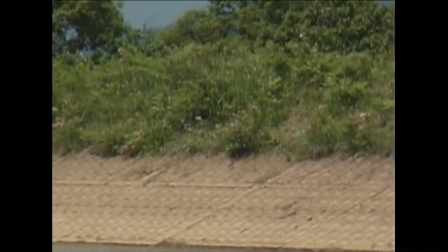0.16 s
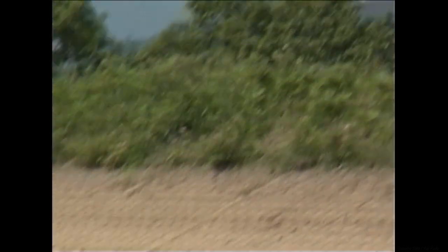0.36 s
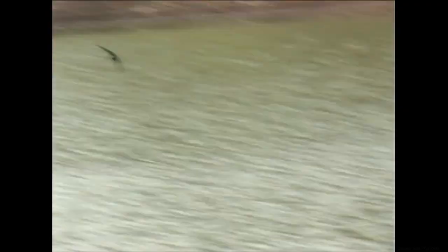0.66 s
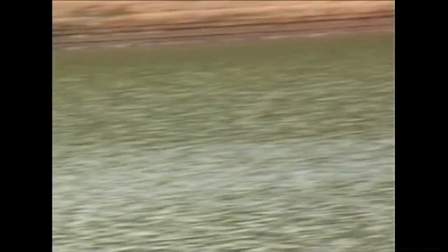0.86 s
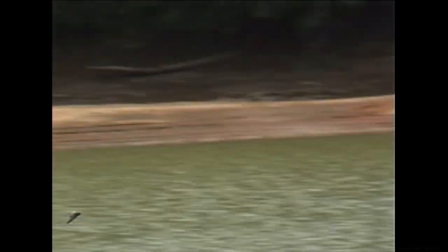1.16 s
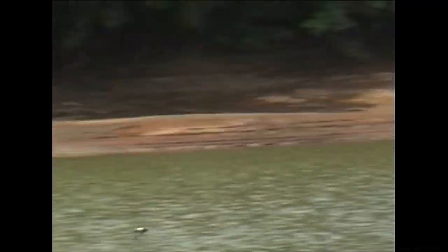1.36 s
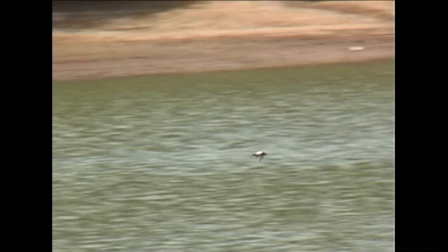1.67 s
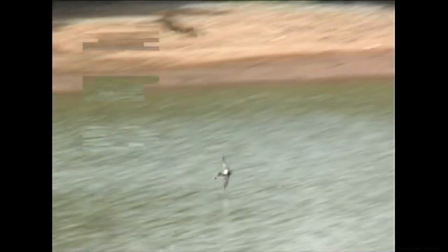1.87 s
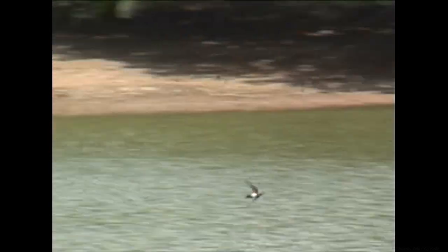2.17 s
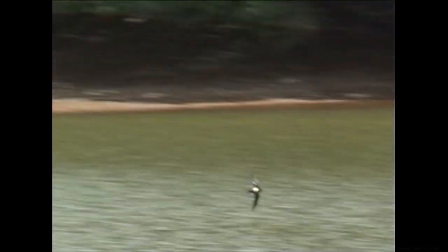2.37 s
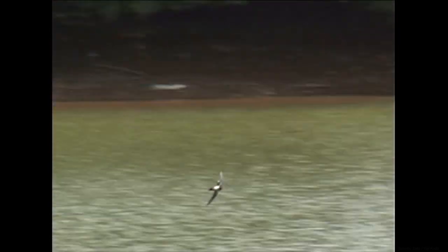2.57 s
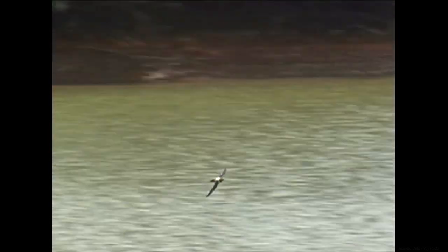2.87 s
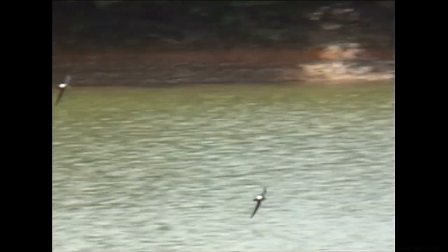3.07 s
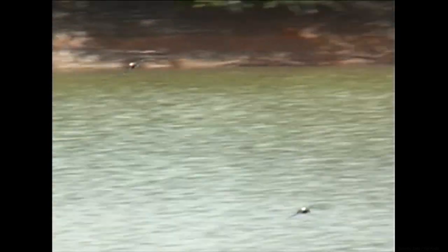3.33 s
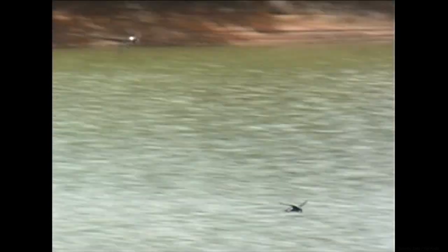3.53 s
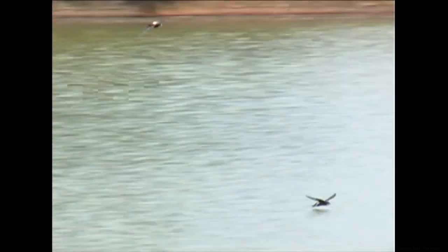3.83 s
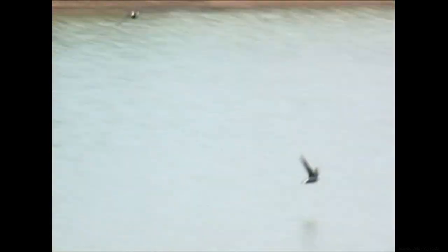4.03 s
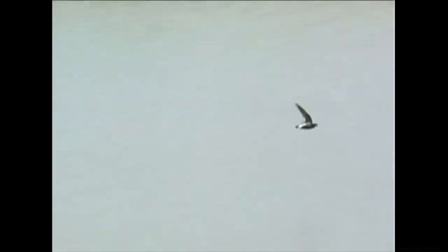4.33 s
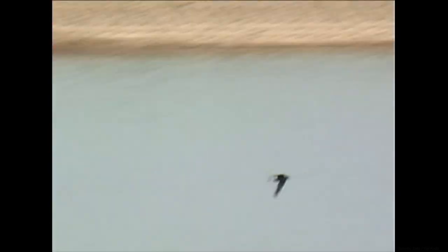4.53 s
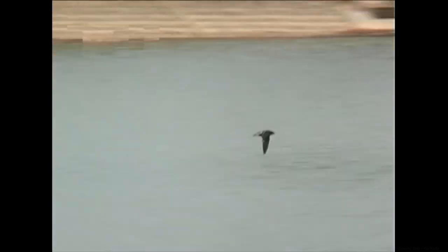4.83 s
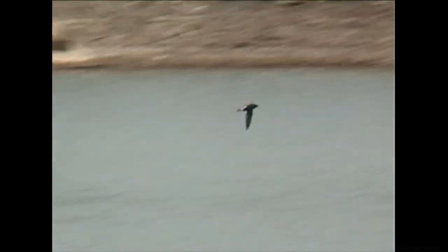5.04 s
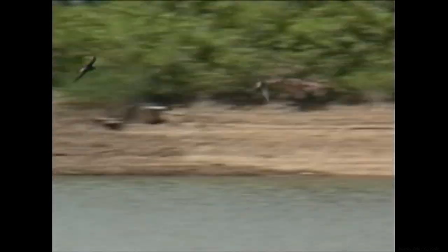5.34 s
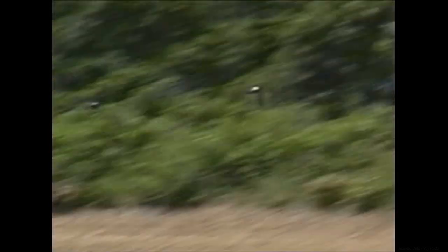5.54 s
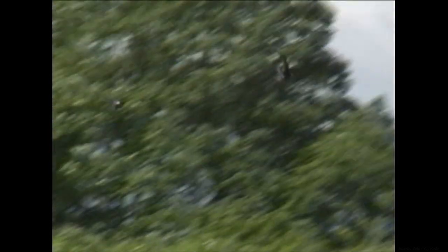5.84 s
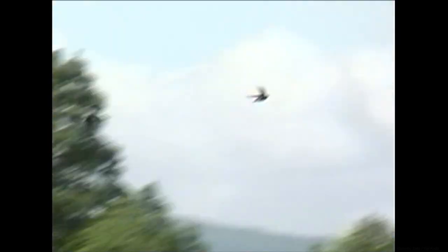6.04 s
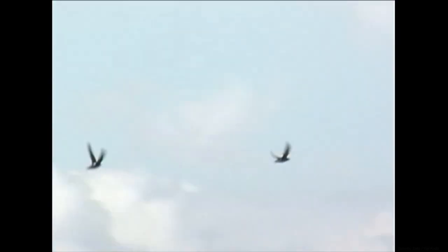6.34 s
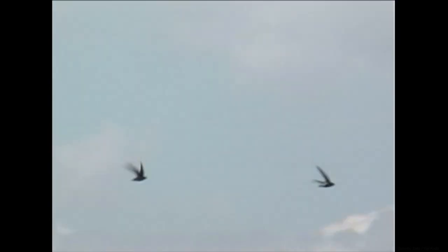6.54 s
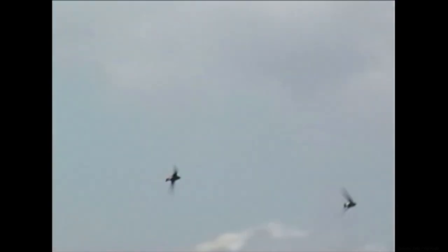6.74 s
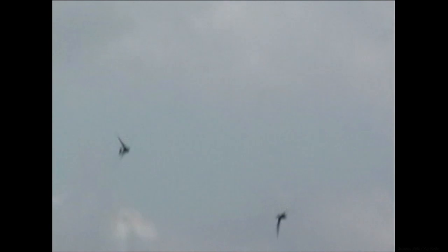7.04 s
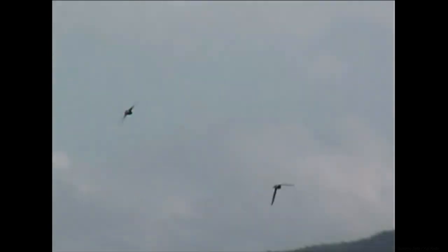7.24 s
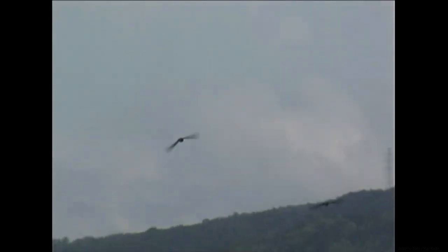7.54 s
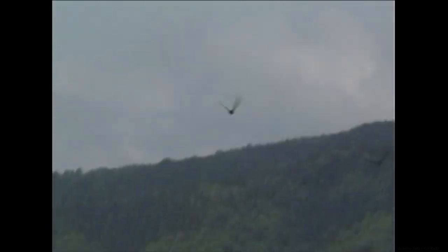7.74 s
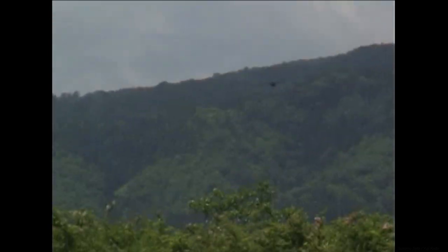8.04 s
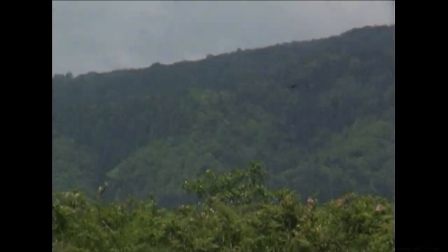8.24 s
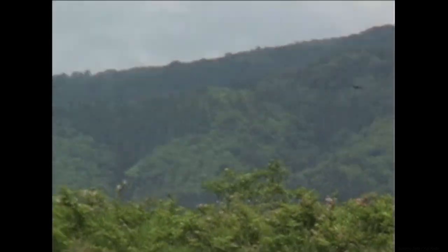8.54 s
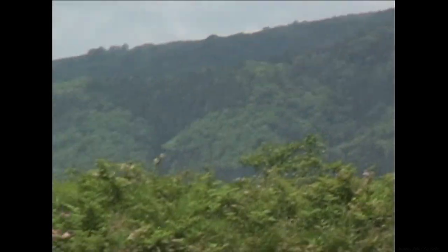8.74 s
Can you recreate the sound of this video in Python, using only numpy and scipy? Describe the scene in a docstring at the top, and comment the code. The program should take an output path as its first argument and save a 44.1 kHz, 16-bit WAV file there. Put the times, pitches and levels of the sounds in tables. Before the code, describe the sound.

Outdoors by a reservoir, a steady hiss of distant leaves and water. A few faint bird chirps, a split-second dropout, then swifts twitter in quick, thin, high bursts. The calls thicken and peak past the middle, with one small sharp snap, then thin out to scattered chirps. Insects buzz faintly. Stereo camera microphone with a slight mechanical whine.

```python
"""An open reservoir: swifts twitter in flight, near and far, and something snaps sharply once.
Calls are gliding sine tones scattered into a short haze; the snap is noise bursts through resonances.
Insects buzz on the bank as narrow noise beaten in level, and a tape drum whines as wavering sine lines.
Shaped stereo noise gives far leaves and water, a treble hiss that rises and sinks partly with them,
and a faint, unsteady bass rumble. The sound drops out once for a moment, under a sharp upper band limit."""
import sys
import numpy as np
from scipy import signal
from scipy.fft import rfft, irfft, next_fast_len
from scipy.io import wavfile
from scipy.ndimage import uniform_filter1d, map_coordinates

SR = 44100
rng = np.random.default_rng(int(sys.argv[2]) if len(sys.argv) > 2 else 0)


def bounce(signal):
    """Save signal as a 16-bit WAV file at the path given by the first command-line argument."""
    frames = np.transpose(np.atleast_2d(signal))
    limited = np.clip(frames, -1, 1)
    pcm = np.round(limited * 32767).astype(np.int16)
    wavfile.write(sys.argv[1], SR, pcm)


N = 392490  # length [samples]

# Near swift calls, with points at 0, 30, 70 and 100 % of the nominal length:
# (time [s], nominal length [ms], start [Hz], early [Hz], late [Hz], end [Hz],
#  early level [dB], late level [dB], left over right [dB])
NEAR_CALLS = [(0.29, 13, 3660, 3590, 3590, 3210, -37, -45, 2),
              (0.414, 13, 3170, 3160, 3200, 2880, -38, -43, 8),
              (1.334, 12, 4260, 4580, 4830, 4610, -43, -41, -11),
              (1.376, 14, 3930, 4310, 4660, 4620, -39, -40, -20),
              (1.39, 14, 6690, 6560, 6390, 6510, -40, -53, 2),
              (1.41, 13, 3620, 3720, 3840, 3870, -46, -39, -5),
              (1.422, 19, 3850, 3910, 3710, 3650, -44, -44, -13),
              (1.431, 14, 6380, 6670, 6590, 6280, -37, -39, 0),
              (1.514, 17, 5000, 4760, 3810, 3790, -44, -43, -14),
              (1.546, 23, 4580, 4620, 4560, 4400, -38, -42, -14),
              (1.679, 9, 5350, 5280, 5630, 6180, -32, -30, 2),
              (1.687, 12, 6520, 6590, 6610, 6180, -19, -25, 5),
              (1.698, 8, 5400, 5360, 4860, 3890, -28, -45, 4),
              (1.846, 14, 6850, 7030, 7000, 6820, -26, -27, 7),
              (1.858, 12, 5510, 5250, 5360, 6010, -40, -50, 8),
              (1.885, 22, 6920, 6900, 6680, 6860, -41, -47, 5),
              (2.0, 14, 5190, 5760, 6210, 6280, -33, -33, 4),
              (2.013, 15, 6190, 6020, 5940, 5840, -31, -42, 3),
              (2.024, 14, 6890, 6940, 6810, 6900, -33, -32, 7),
              (2.138, 20, 6940, 6880, 6870, 6800, -44, -46, 12),
              (2.182, 16, 7110, 7490, 7320, 6500, -27, -37, -3),
              (2.22, 22, 6580, 7600, 7860, 6440, -31, -29, -2),
              (2.25, 16, 5020, 5070, 5110, 4510, -41, -44, -2),
              (2.267, 7, 7060, 6970, 7050, 7160, -32, -35, 6),
              (2.276, 19, 8760, 8540, 6940, 6840, -40, -31, 2),
              (2.386, 20, 6520, 6610, 6970, 7000, -41, -46, 4),
              (2.405, 12, 6900, 6890, 6480, 6110, -38, -50, 10),
              (2.417, 18, 5110, 5550, 5780, 5350, -36, -32, 4),
              (2.434, 8, 5450, 5280, 5080, 5070, -30, -44, 4),
              (2.501, 19, 4530, 4920, 5050, 4840, -32, -37, -1),
              (2.519, 14, 4850, 4800, 4490, 4220, -30, -40, 0),
              (2.598, 21, 4990, 5230, 5130, 4840, -19, -21, 3),
              (2.624, 15, 4710, 4850, 4880, 4850, -41, -32, 2),
              (2.638, 15, 4850, 4730, 4430, 4380, -36, -32, 3),
              (3.055, 16, 4520, 4430, 4400, 4320, -45, -46, -13),
              (3.217, 20, 4380, 5490, 5850, 5770, -36, -44, -15),
              (3.255, 7, 4810, 4610, 4930, 5150, -43, -37, -15),
              (3.259, 23, 5830, 6020, 5900, 4460, -34, -40, -19),
              (3.99, 22, 4750, 5350, 5040, 4280, -33, -40, 5),
              (4.087, 13, 4910, 5120, 5400, 5280, -41, -44, 0),
              (4.095, 8, 6110, 6250, 6310, 6420, -42, -37, 2),
              (4.102, 22, 6380, 6630, 6510, 6470, -39, -40, 2),
              (4.126, 17, 3770, 3710, 3560, 3370, -41, -42, 1),
              (4.198, 18, 5360, 5030, 4650, 5020, -41, -47, 1),
              (4.199, 21, 6480, 6350, 6110, 5670, -41, -45, 1),
              (4.236, 17, 6360, 6500, 6430, 6310, -32, -35, 1),
              (4.262, 16, 4420, 4350, 4080, 3990, -42, -46, -9),
              (4.308, 19, 6670, 6800, 6100, 5630, -49, -45, 5),
              (4.363, 16, 6360, 6870, 7080, 7010, -49, -40, 2),
              (4.376, 12, 4380, 4590, 4660, 4680, -42, -42, -7),
              (4.413, 16, 6270, 7260, 7750, 7470, -38, -42, -1),
              (4.46, 15, 6260, 6630, 6650, 6600, -38, -42, 0),
              (4.506, 21, 6920, 7730, 6830, 6080, -38, -49, 0),
              (4.537, 11, 5140, 5070, 4940, 4920, -39, -46, 1),
              (4.542, 13, 6450, 6680, 6920, 6920, -39, -50, 0),
              (4.554, 18, 7600, 7510, 7560, 7620, -40, -52, -1),
              (4.585, 23, 6300, 6590, 6690, 6040, -43, -43, -1),
              (4.678, 17, 6330, 6280, 6190, 6060, -46, -43, 5),
              (4.703, 27, 4370, 4550, 4350, 3660, -43, -43, -1),
              (4.795, 17, 4890, 4870, 4920, 4480, -40, -48, -5),
              (4.795, 30, 6910, 6760, 6460, 6780, -33, -40, -3),
              (4.835, 19, 4970, 4960, 4910, 4510, -37, -38, -1),
              (4.874, 10, 5910, 6110, 6170, 6230, -38, -34, 11),
              (4.883, 30, 6290, 6570, 6520, 5920, -32, -30, -2),
              (4.912, 22, 5890, 5970, 6090, 6080, -28, -40, 8),
              (4.933, 14, 6020, 6030, 5720, 5770, -34, -43, 10),
              (5.021, 17, 4020, 4370, 4450, 4570, -45, -35, 5),
              (5.037, 9, 4490, 4680, 4890, 4980, -40, -38, 7),
              (5.04, 16, 6730, 6780, 6710, 6260, -23, -24, 2),
              (5.075, 24, 6350, 6480, 6650, 6020, -30, -31, -1),
              (5.091, 14, 4810, 4910, 4700, 4600, -45, -38, -1),
              (5.192, 24, 5390, 6070, 5990, 5980, -36, -41, -5),
              (5.24, 15, 6270, 6470, 6530, 6230, -16, -18, 3),
              (5.251, 14, 4140, 4390, 4400, 3550, -47, -38, 3),
              (5.261, 19, 6860, 7160, 7050, 6880, -23, -29, 6),
              (5.276, 7, 5410, 5450, 5330, 5100, -36, -45, 4),
              (5.28, 21, 6140, 6490, 6220, 5490, -20, -28, 1),
              (5.296, 10, 4290, 4690, 4390, 4290, -35, -39, 4),
              (5.299, 19, 6410, 6790, 6510, 6060, -24, -31, 0),
              (5.349, 21, 4030, 4550, 4660, 4960, -34, -30, 0),
              (5.366, 22, 5760, 6010, 6020, 5620, -27, -27, -2),
              (5.394, 7, 4650, 4730, 4890, 5090, -29, -31, -1),
              (5.399, 15, 5940, 6070, 5840, 5930, -24, -35, -1),
              (5.428, 15, 6300, 6600, 6510, 6160, -14, -20, 1),
              (5.444, 9, 4860, 4720, 4820, 4910, -27, -37, -1),
              (5.451, 17, 6250, 6580, 6660, 6280, -19, -19, 2),
              (5.478, 16, 5060, 4990, 5410, 5210, -38, -47, 0),
              (5.483, 24, 6230, 6310, 6160, 6540, -34, -40, -4),
              (5.506, 11, 4570, 4750, 4860, 4880, -36, -29, -2),
              (5.51, 28, 6090, 5960, 6410, 6640, -39, -45, -1),
              (5.543, 12, 5930, 6190, 6100, 5620, -37, -40, -5),
              (5.568, 13, 4990, 5040, 5260, 6090, -37, -41, 1),
              (5.58, 19, 6720, 6840, 6760, 6200, -22, -25, 0),
              (5.598, 6, 5020, 4900, 4810, 4920, -39, -38, -1),
              (5.603, 10, 5990, 6280, 6220, 6580, -32, -41, 0),
              (5.617, 15, 6480, 5830, 6670, 6530, -43, -36, -1),
              (5.631, 13, 6190, 6240, 6190, 6210, -29, -37, -3),
              (5.662, 15, 6110, 6320, 6250, 5860, -28, -31, 3),
              (5.665, 18, 4720, 4610, 4570, 4440, -40, -43, 1),
              (5.693, 20, 6030, 6380, 6210, 6330, -29, -36, 5),
              (5.723, 12, 4890, 5010, 5100, 5000, -32, -46, 0),
              (5.726, 16, 6270, 6280, 6410, 5690, -39, -38, 4),
              (5.76, 11, 4900, 4920, 4750, 4850, -39, -45, 3),
              (5.765, 18, 6540, 6510, 6540, 6570, -30, -37, 3),
              (5.786, 19, 4580, 4530, 5230, 5390, -41, -44, 3),
              (5.798, 16, 6530, 6430, 6460, 6510, -31, -40, 2),
              (5.902, 21, 5210, 5820, 6510, 5760, -33, -33, 15),
              (5.964, 16, 4710, 5030, 4710, 4310, -45, -44, 17),
              (6.114, 15, 6400, 6350, 6180, 5690, -42, -48, 7),
              (6.226, 16, 5660, 6220, 5950, 5970, -36, -41, 6),
              (6.281, 11, 5450, 5500, 5160, 5390, -40, -49, 8),
              (6.326, 15, 6470, 6650, 6450, 6700, -40, -43, -4),
              (6.371, 13, 6400, 6460, 6490, 6280, -45, -42, -5),
              (6.413, 8, 6540, 6660, 6700, 6680, -43, -42, -2),
              (6.422, 12, 6690, 6750, 6790, 7510, -41, -51, -5),
              (6.455, 20, 6510, 6690, 6690, 6520, -37, -40, -2),
              (6.599, 23, 6380, 6600, 6400, 6490, -47, -47, -2),
              (6.753, 19, 5440, 5510, 5480, 5480, -32, -36, 18),
              (6.909, 14, 5220, 5270, 5480, 5770, -34, -36, 14),
              (6.922, 30, 6450, 6760, 6680, 6410, -39, -39, -2),
              (6.964, 19, 4590, 4610, 4510, 4400, -44, -44, 10),
              (7.009, 11, 5180, 5240, 5630, 5720, -40, -43, 11),
              (7.015, 9, 6720, 6630, 6710, 6790, -40, -29, 6),
              (7.023, 22, 6780, 6820, 6760, 6590, -29, -31, -1),
              (7.043, 15, 6310, 6230, 6000, 5920, -34, -44, 14),
              (7.192, 16, 6910, 7030, 6940, 7160, -43, -52, 2),
              (7.232, 14, 6860, 6890, 6890, 6520, -48, -52, -7),
              (7.441, 23, 7220, 7090, 7170, 6890, -41, -47, 2),
              (7.488, 28, 6750, 7230, 7080, 6890, -50, -52, -10),
              (7.563, 21, 6400, 6690, 6720, 6350, -44, -48, 2),
              (7.595, 11, 4310, 4310, 4160, 4190, -42, -39, 9),
              (7.659, 21, 6450, 6530, 6440, 6000, -39, -41, 1),
              (7.816, 22, 4790, 5040, 4930, 4810, -41, -43, 10),
              (7.92, 16, 6280, 6440, 6270, 5610, -43, -48, 1),
              (7.975, 17, 6260, 6430, 6400, 6490, -46, -52, -3),
              (8.111, 16, 5570, 5500, 5300, 4940, -34, -42, 14),
              (8.117, 17, 6270, 6680, 6410, 5510, -38, -50, 3),
              (8.383, 10, 6420, 6450, 6420, 6420, -45, -48, -3),
              (8.517, 21, 6280, 6680, 6510, 6060, -21, -21, 3),
              (8.537, 10, 6260, 5190, 4490, 4580, -33, -45, -3),
              (8.559, 9, 5190, 5190, 5320, 5370, -26, -35, -4),
              (8.563, 20, 6270, 6260, 6100, 5270, -30, -37, 2),
              (8.806, 15, 4710, 5040, 4990, 4410, -33, -37, -5),
              (8.852, 23, 4410, 4520, 4410, 3980, -40, -40, 16),
              (8.878, 13, 6050, 6200, 6110, 5470, -33, -44, -2)]
# Distant swift calls: (time of the middle [s], nominal pitch [Hz], nominal level [dB])
FAR_CALLS = [(0.064, 3660, -46), (0.117, 4420, -46), (0.182, 4920, -51), (0.2, 4800, -49),
             (0.273, 3610, -44), (0.378, 3600, -45), (0.467, 5680, -46), (2.74, 4410, -48),
             (2.759, 4650, -47.5), (2.814, 5000, -49), (2.835, 4540, -51), (2.918, 4650, -50),
             (2.959, 4500, -49), (4.043, 4530, -46), (4.078, 4420, -47), (4.113, 3510, -45.5),
             (4.148, 3930, -47), (4.344, 4690, -48), (4.356, 4750, -43.5), (4.412, 3730, -46),
             (4.434, 3750, -48), (4.488, 4400, -45), (4.744, 4110, -48), (5.137, 4570, -45),
             (5.152, 4610, -47), (5.827, 3920, -43), (5.842, 3460, -43.5), (6.143, 4050, -48.5),
             (6.17, 3570, -48.5), (6.231, 3230, -46.5), (6.302, 4100, -47), (6.517, 6200, -52),
             (6.8, 4520, -44.5), (7.098, 4280, -49), (7.219, 3970, -46), (7.232, 5800, -46.5),
             (7.26, 3900, -47.5), (7.282, 5680, -52), (7.347, 6590, -59), (7.401, 6730, -54),
             (7.444, 4220, -45), (7.461, 3900, -46), (7.62, 3860, -48), (7.784, 5100, -51),
             (7.901, 3200, -45.5), (7.945, 3320, -46.5), (7.991, 3370, -45.5), (8.084, 6600, -50),
             (8.2, 5830, -55), (8.345, 6590, -51), (8.42, 4280, -47)]
# Cracks of the snap: (time [s], relative level [dB])
SNAP_CRACKS = [(5.0581, -15), (5.059, -12), (5.0613, -26)]
# Resonances of the snap: (centre [Hz], width [Hz], relative level [dB])
SNAP_MODES = [(5200, 750, 2), (6850, 1500, -5.5), (8700, 2200, -6)]
# Insect phrases: (start [s], end [s], centre of the rasp [Hz], rms level before swell and balance [dB])
INSECT_PHRASES = [(0, 0.507, 8360, -63), (0.524, 0.603, 8200, -52), (3.2, 3.753, 8480, -68),
                  (3.473, 3.92, 7900, -66), (4.45, 4.874, 8300, -62.5), (4.71, 5.15, 8000, -59.5),
                  (5.498, 5.97, 8320, -62.5), (6.003, 6.534, 8070, -60), (6.202, 6.46, 8220, -55),
                  (6.741, 6.975, 8250, -52.5), (7.18, 7.446, 8230, -57), (7.331, 7.848, 7980, -56),
                  (7.625, 7.926, 8230, -58.5), (7.898, 8.896, 8290, -64.5), (8.248, 8.55, 8000, -59.5),
                  (8.722, 8.906, 8020, -54), (5.158, 5.45, 3920, -70), (5.807, 6.15, 2900, -61),
                  (7.101, 7.4, 3950, -65), (7.732, 8.01, 4010, -60.5)]
# Whine and sidebands of the tape drum: (frequency [Hz], relative level [dB])
DRUM_LINES = [(1439, -80), (1469, -75), (1498, -78), (2397, -79.5), (2697, -93.5)]
# Course of the open air: (time [s], relative level [dB])
AIR_LEVEL = [(0.0, -54), (2.63, -53), (3.2, -56.5), (4.86, -54.5), (5.45, -50), (6.0, -55), (8.9, -55)]
# Spectrum of far leaves and water: (frequency [Hz], relative density [dB per Hz])
AIR_SPECTRUM = [(410, -83), (700, -58.5), (1290, -23), (1480, -7), (1650, -11.5), (2690, -2.5),
                (3120, -2.5), (3400, 0), (6390, -9), (8090, -14), (9000, -21.5), (11700, -60),
                (19800, -120)]
# Spectrum of the treble hiss: (frequency [Hz], relative density [dB per Hz])
HISS_SPECTRUM = [(2000, -23.5), (6000, 15), (9500, 12.5), (12000, 10), (14200, 10), (14500, -32)]
# Spectrum of the faint bass rumble: (frequency [Hz], relative density [dB per Hz])
BASS_SPECTRUM = [(40, -35), (100, 7.5), (220, -10.5), (500, -33), (800, -33)]
# Likeness of left and right noise: (frequency [Hz], correlation [-1 to 1])
STEREO_LIKENESS = [(1000, 0.31), (3000, -0.25), (7000, -.3), (14000, -0.098)]
# Balance of the noise: (frequency [Hz], left over right [dB])
STEREO_BALANCE = [(1300, -1), (2400, 1), (4400, 3.5), (8000, -1), (15000, 1)]
# The dropout: (start [s], end [s])
DROPOUT = (0.5054, .531)
TOP_HZ = 15579  # upper band limit


def amp(db):
    """Decibel law: twenty decibels are a factor of ten in amplitude."""
    return 10 ** (np.asarray(db) / 20)


def unit(x):
    """Normalisation: scale to a root mean square of 1."""
    return x / np.sqrt(np.mean(x ** 2) + 1e-20)


def along(points, hz):
    """Interpolation of (frequency [Hz], value) points on a logarithmic frequency axis."""
    f, v = np.transpose(points)
    return np.interp(np.log(hz + 1), np.log(f + 1), v)


def wobble(rate):
    """Slow modulation: a smooth curve through random knots, rate of them a second."""
    knots = rng.standard_normal(int(N * rate / SR) + 4)
    return map_coordinates(knots, [np.arange(N) * rate / SR])


def filtered(x, response):
    """Linear filtering: multiply the spectrum by a complex response of frequency."""
    m = next_fast_len(N + SR // 2)
    return irfft(rfft(x, m) * response(np.fft.rfftfreq(m, 1 / SR)), m)[..., :N]


def whistles(notes, fade_db, flick_db, flutter_db, turn):
    """Frequency modulation: sine tones slide up into each start and close with a quick downward flick."""
    out = np.zeros((2, N + SR))
    share = np.array([0, .3, .7, 1])
    flutter = flutter_db * wobble(350)
    for s, ms, *hz, early_db, late_db, pan_db in notes:
        knots = np.r_[-3, share * ms, ms + 5]  # the slide and flick lie outside the nominal length
        start = round(max(s + knots[0] / 1000, 0) * SR)
        u = np.arange(knots[0], knots[-1], 1000 / SR)  # ms

        def soft(values):
            return uniform_filter1d(np.interp(u, knots, values), size=len(u) // 9, mode="nearest")

        level_db = soft([early_db - flick_db, early_db - fade_db, early_db,
                         late_db, late_db - fade_db, late_db - flick_db])
        edge = np.clip(np.minimum(u - knots[0], knots[-1] - u) / 2, 0, 1)  # 2 ms to open and close
        level = amp(level_db + np.resize(flutter[start:], len(u))) * edge
        pitch = soft([.9 * hz[0], *hz, .76 * hz[-1]])
        phase = 2 * np.pi * np.cumsum(pitch) / SR
        # a bird off to one side reaches the two channels at unlike level and phase
        gains = np.sqrt(2 / (1 + amp([[-2 * pan_db], [2 * pan_db]])))
        tone = np.sin(phase + [[-turn * pan_db], [turn * pan_db]])
        out[:, start:start + len(u)] += gains * level * tone
    return out[:, :N]


def far_flock(count, far_db):
    """Superposition: distant calls arch shallowly and fall, with fainter ones at random moments around."""
    draws = rng.uniform([1.5, -.3, 3003, -6], [len(FAR_CALLS), .3, 5000, 3], (count, 4))
    pick, late, hz, spread_db = draws.T
    faint_s = np.array(FAR_CALLS)[pick.astype(int), 0] + late
    faint = np.column_stack([faint_s, hz, far_db + spread_db])
    s, top, db = np.vstack([FAR_CALLS, faint]).T
    ms, pan_db = rng.uniform([16, -8], [28, 8], (len(s), 2)).T
    arch = top[:, None] * [.97, 1.02, .98, 0.78]
    notes = np.column_stack([s - ms / 2000, ms, arch, db, db - 3.5, pan_db])
    return whistles(notes[s < N / SR], fade_db=8.5, flick_db=16.5, flutter_db=4, turn=0.022)


def snap():
    """Impulse excitation: cracks within milliseconds ring short bright resonances."""
    blows = np.zeros((2, N))
    t = np.arange(200) / SR
    for s, db in SNAP_CRACKS:
        decay = amp(db + 10 - 60 * t / 0.0038)  # falls 60 dB in 3.8 ms
        burst = decay * (1 - np.exp(-t / 0.00022))
        blows[:, round(s * SR):][:, :200] += burst * rng.standard_normal(200) * amp([[2], [-2]])

    def response(f):
        body = 0
        for k, (centre, width, db) in enumerate(SNAP_MODES):
            mode = 1j * f * width / (centre ** 2 - f ** 2 + 1j * f * width)
            body = body + (-1) ** k * amp(db) * mode  # neighbours in opposite phase
        low_cut = (1j * f / 3000) ** 4 / (1 + 1j * f / 3000) ** 4
        return 2 * body * low_cut / (1 + (f / 11000) ** 10)

    return filtered(blows, response)


def banks(x, t60, wet_db):
    """Diffuse scattering: water and banks return the calls as a haze falling 60 dB in t60 seconds."""
    t = np.arange(SR // 2) / SR
    onset = np.clip(t / 0.0025, 0, 1)
    tail = rng.standard_normal((2, len(t))) * amp(-60 * t / t60) * onset
    return amp(wet_db) * signal.fftconvolve(x, tail / np.linalg.norm(tail[0]), axes=1)[:, :N]


def insects(rate, depth_db, sharp, lag):
    """Amplitude modulation: narrow noise beats rate times a second; the left hears it lag seconds late."""
    out = np.zeros(N)
    t = np.arange(N) / SR
    for s, end, hz, db in INSECT_PHRASES:
        u = t[round(s * SR):round(end * SR)] - s
        beat = amp(depth_db * np.cos(2 * np.pi * rate * u + rng.uniform(0, 2 * np.pi)))
        wing = signal.iirpeak(hz, sharp, SR)
        rasp = signal.lfilter(*wing, rng.standard_normal(len(u)))
        rasp = signal.lfilter(*wing, rasp)
        swell = np.clip(np.minimum(u, u[-1] - u) / .045, 0, 1)  # 45 ms in and out
        out[round(s * SR):][:len(u)] += amp(db) * swell * unit(beat * rasp)

    def to_channels(hz):
        return amp([[-3], [3]]) * np.exp(-2j * np.pi * hz * np.array([[lag], [0]]))

    return filtered(out, to_channels)


def drum():
    """Line spectrum: the tape drum's whine and sidebands are sines wavering in strength and phase."""
    t = np.arange(N) / SR
    whine = np.zeros(N)
    for hz, db in DRUM_LINES:
        level = amp(db + 4.5 + 4.9 * wobble(9))
        whine += level * np.sin(2 * np.pi * hz * t + 1.2 * wobble(11))
    return whine * amp([[-3], [2.5]])


def rush(spectrum, patchy_db):
    """Partly correlated noise: mid and side set the stereo likeness; gain varies in random patches."""
    z = signal.stft(rng.standard_normal((2, N)), nperseg=256)[2]
    field = uniform_filter1d(rng.standard_normal(z.shape[1:]), size=4, axis=0)  # over frequency
    field = uniform_filter1d(field, size=10, axis=1)  # over time
    pair = signal.istft(z * amp(patchy_db * unit(field)), nperseg=256)[1][:, :N]

    def mid_side(hz):
        angle = np.arccos(np.clip(along(STEREO_LIKENESS, hz), -1, 1)) / 2
        return amp(along(spectrum, hz)) * [np.cos(angle), np.sin(angle)]

    def balance(hz):
        return amp(along(STEREO_BALANCE, hz) * np.array([[.5], [-.5]]))

    mid, side = filtered(pair, mid_side)
    return filtered(np.array([mid + side, mid - side]), balance) / np.std(mid)


def air():
    """Broadband noise: far leaves and water, a treble hiss that rises and sinks partly with them, a rumble."""
    s, points_db = np.transpose(AIR_LEVEL)
    air_db = np.interp(np.arange(N) / SR, s, points_db)
    far = amp(air_db + 2 + .7 * wobble(8)) * rush(AIR_SPECTRUM, patchy_db=1.5)
    hiss = amp(-61 + .6 * (air_db - air_db.mean())) * rush(HISS_SPECTRUM, patchy_db=.8)
    rumble = amp(-106 + 5.3 * wobble(9.7)) * rush(BASS_SPECTRUM, patchy_db=2.5)
    return far + hiss + rumble


def scene():
    """Superposition of direct calls and snap, their scattered haze, and the quieter sources."""
    near = whistles(NEAR_CALLS, fade_db=10, flick_db=16, flutter_db=1.6, turn=.03)  # turn [rad per dB]
    birds = near + far_flock(count=90, far_db=-50.5) + snap()
    echo = banks(birds, t60=0.11, wet_db=-13.5) + banks(birds, t60=0.57, wet_db=-21)
    return birds + echo + insects(rate=102, depth_db=4, sharp=25, lag=.000035) + drum() + air()


def record(dry):
    """Gating and band limiting: the level drops out briefly; nothing is kept above TOP_HZ."""
    start, end = DROPOUT
    times = [start, start + 0.0005, end - .006, end - .0005, end]
    gap_db = np.interp(np.arange(N) / SR, times, [-1, -30, -39, -5, -0.5])
    return filtered(dry * amp(gap_db), lambda hz: hz < TOP_HZ)


dry = scene()
out = record(dry)
bounce(out)
```